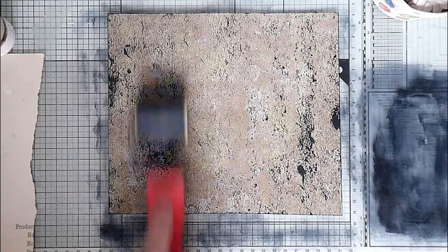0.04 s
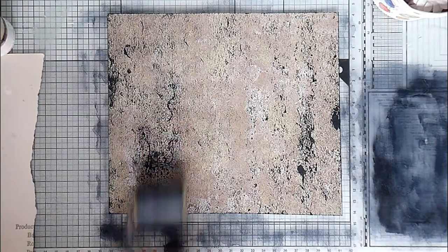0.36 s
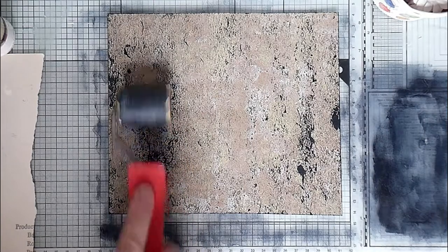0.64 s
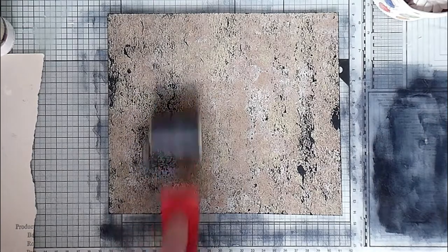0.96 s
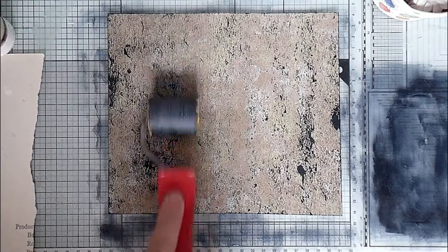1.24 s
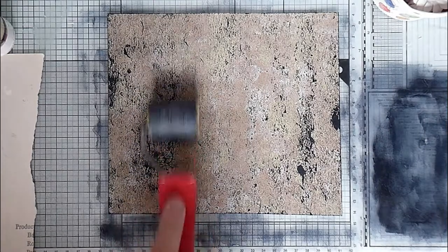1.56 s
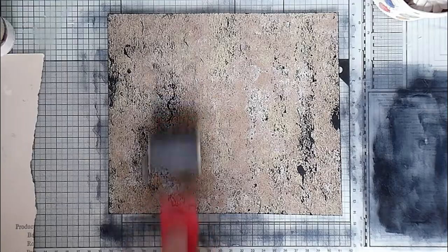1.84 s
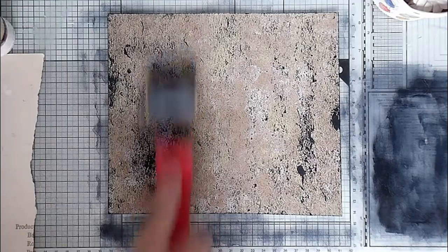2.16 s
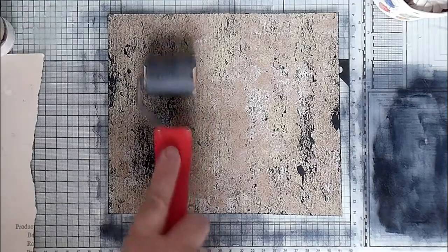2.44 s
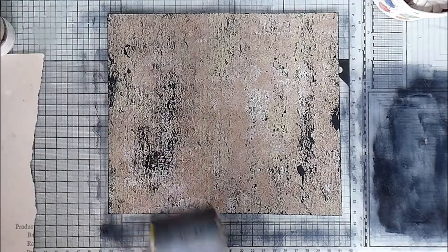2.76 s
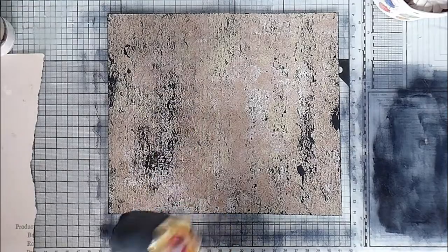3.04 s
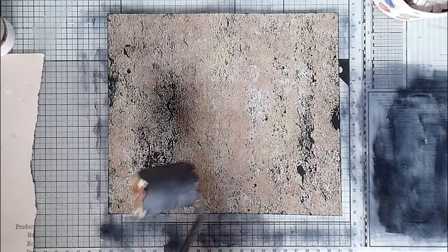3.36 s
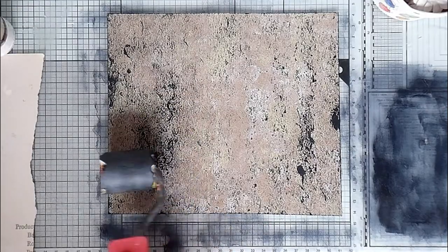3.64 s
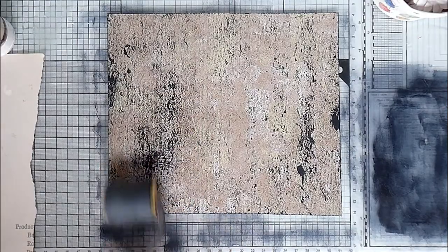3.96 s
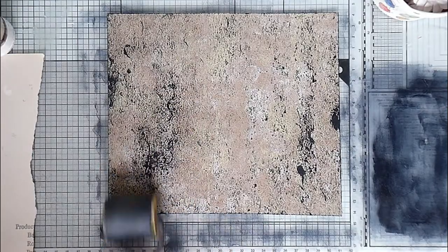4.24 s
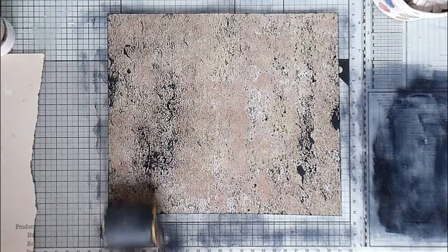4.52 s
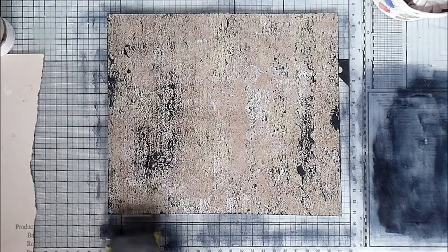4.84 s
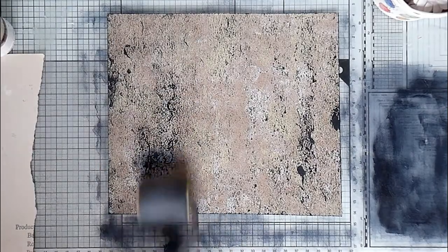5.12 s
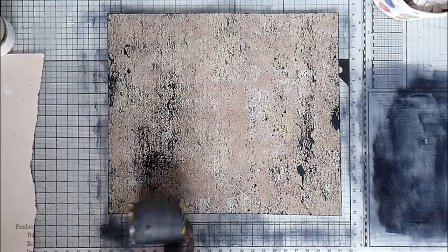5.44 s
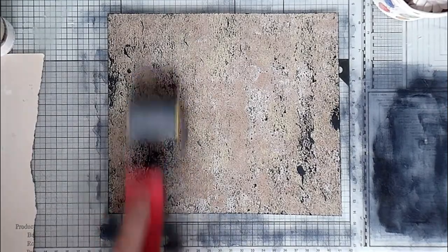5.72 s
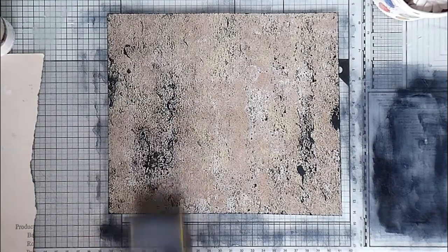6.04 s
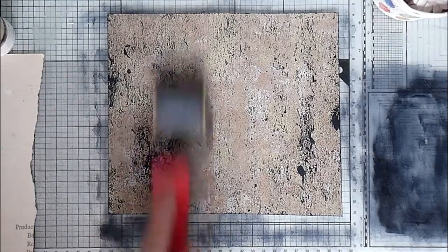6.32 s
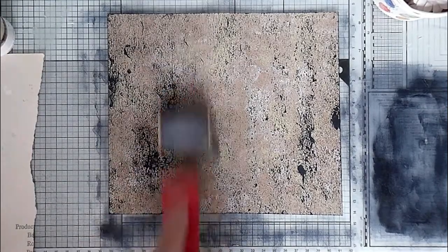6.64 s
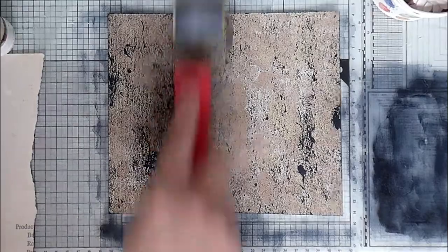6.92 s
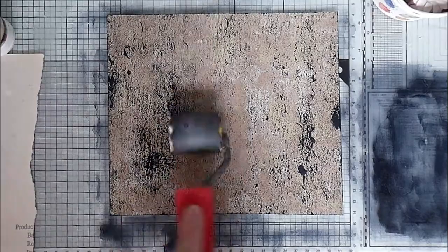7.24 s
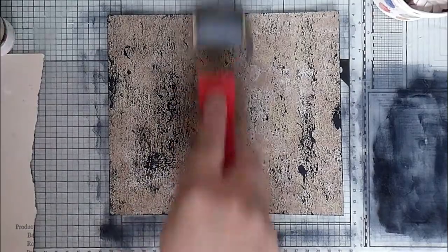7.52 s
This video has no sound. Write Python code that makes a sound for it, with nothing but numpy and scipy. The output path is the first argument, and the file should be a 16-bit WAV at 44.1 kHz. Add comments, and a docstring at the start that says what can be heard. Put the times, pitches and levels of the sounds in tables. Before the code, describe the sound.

A small rubber paint roller rubs quickly back and forth over thick card, each stroke a sticky hiss with a low rumble and faint hum. Its loose drum gives hollow plastic clicks, and hard landings knock on the table. Around three seconds in it lifts off with light scrapes and clicks, then the rolling resumes, with more sharp knocks near the end. It sounds close, in a small furnished room.

```python
"""A small rubber paint roller runs back and forth over thick card on a craft table.
As each stroke speeds up and slows, tacky paint fizzes off the drum, the card rumbles and the axle
rubs a hum from the drum; patches of paint let go with a snap. The loose drum clicks and rings hollowly
as it hits its axle stop or lands on the card. Now and then the roller lands hard and the table rings.
Off the card, the drum scrapes along its wire and the handle rustles. The room is small and furnished."""
import sys
import numpy as np
from scipy import signal
from scipy.fft import rfft, irfft, next_fast_len
from scipy.io import wavfile
from scipy.ndimage import uniform_filter1d, map_coordinates

SR = 44100
rng = np.random.default_rng(int(sys.argv[2]) if len(sys.argv) > 2 else 0)


def transcribe(signal):
    """Save signal, clipped to [-1, 1], as a 16-bit WAV file at the path in sys.argv[1]."""
    frames = np.atleast_2d(signal).T
    limited = np.clip(frames, -1, 1)
    pcm = np.round(limited * 32767).astype(np.int16)
    wavfile.write(sys.argv[1], SR, pcm)


N = 343098
T = np.arange(SR // 4) / SR  # time since a blow, s


def amp(db):
    """Decibels to gain."""
    return 10 ** (np.asarray(db) / 20)


def unit(x):
    """Scale to rms 1."""
    return x / np.sqrt(np.mean(x ** 2) + 1e-20)


def unit_head(x, span_s):
    """Scale a blow to rms 1 over its first span_s."""
    return x / np.sqrt(np.mean(x[T < span_s] ** 2) + 1e-20)


def along(points, hz):
    """Interpolate (f/Hz, value) points on a log axis."""
    f, value = np.transpose(points)
    return np.interp(np.log(hz + 1), np.log(f + 1), value)


def wobble(rate_hz):
    """Smooth random curve, rate_hz knots a second."""
    knots = rng.standard_normal(int(N * rate_hz / SR) + 4)
    return map_coordinates(knots, [np.arange(N) * rate_hz / SR])


def filtered(x, response):
    """Apply a frequency response."""
    n = x.shape[-1]
    size = next_fast_len(n + 8192)
    return irfft(rfft(x, size) * response(np.fft.rfftfreq(size, 1 / SR)), size)[..., :n]


def coloured(x, spectrum, size=1024):
    """Minimum-phase filter with the given spectrum."""
    cepstrum = irfft(np.log(amp(along(spectrum, np.fft.rfftfreq(size, 1 / SR)))))
    cepstrum[1:size // 2] *= 2
    cepstrum[size // 2 + 1:] = 0
    return signal.fftconvolve(x, irfft(np.exp(rfft(cepstrum))))[:len(x)]


def band(x, lo_hz, hi_hz, order=3, span_s=0.036):
    """One band of a blow, at rms 1 over its first span_s."""
    sos = signal.butter(order, [lo_hz, hi_hz], "band", fs=SR, output="sos")
    return unit_head(signal.sosfilt(sos, x), span_s)


def burst(t60_s):
    """Decaying noise."""
    return rng.standard_normal(len(T)) * amp(-60 * T / t60_s)


def attack(rise_s):
    """Exponential rise to 1."""
    return 1 - np.exp(-T / rise_s)


def ringing(modes, hz):
    """Damped sines at ratios of hz, in random phase."""
    return sum(amp(db - 60 * T / t60_s) * np.sin(2 * np.pi * (ratio * hz * T + rng.random()))
               for ratio, db, t60_s in modes)


def add(track, t_s, sound):
    """Mix a sound in at t_s."""
    i = round(t_s * SR)
    track[i:i + len(sound)] += sound[:N - i]


# left-right likeness: f/Hz, correlation
COHERENCE = [(60, 0.94), (150, 0.76), (380, 0.72), (950, 0.29), (2380, 0.31), (5980, 0.76), (15000, 0.73)]


def spread(pair, response):
    """Two unrelated signals become coloured, partly alike stereo of rms 1."""
    def mid_side(hz):
        angle = np.arccos(along(COHERENCE, hz)) / 2
        return response(hz) * np.array([np.cos(angle), np.sin(angle)])
    mid, side = filtered(pair, mid_side)
    return unit(np.array([mid + side, mid - side]))


def noise(spectrum):
    """Stereo noise with the given spectrum."""
    return spread(rng.standard_normal((2, N)), lambda hz: amp(along(spectrum, hz)))


# pushes and pulls: t/s, length/s, fastest point/share of length, fizz/dB, rumble/dB, hum/dB
STROKES = [(-.02, 0.28, .45, -50.5, -52, -50), (0.259, 0.24, 0.67, -48.5, -49, -50.5),
           (.575, 0.24, 0.34, -52.5, -55, -54.5), (0.769, .195, .45, -50, -53, -59.5),
           (1.03, 0.21, 0.5, -50, -54, -57), (1.217, 0.15, 0.43, -49.5, -52, -57),
           (1.36, 0.14, 0.4, -50, -52.5, -56), (1.495, 0.14, 0.54, -50, -52, -54.5),
           (1.63, 0.17, 0.6, -51, -53, -59), (1.797, 0.22, 0.56, -48, -49, -50),
           (1.998, .2, 0.54, -48, -47, -50), (2.199, 0.15, .5, -47, -49.5, -48),
           (2.362, 0.16, 0.54, -49, -48.5, -50), (2.533, .27, 0.36, -47.5, -48.5, -47.5),
           (3.791, 0.21, 0.79, -52.5, -57.5, -58), (4.016, 0.12, 0.6, -49.5, -57, -54.5),
           (4.147, 0.15, 0.54, -50.5, -56, -53), (4.317, 0.14, .47, -48, -53.5, -54.5),
           (4.449, 0.17, 0.63, -49.5, -54, -48.5), (4.625, 0.14, 0.36, -50, -56.5, -53.5),
           (4.764, 0.15, 0.52, -49.5, -53.5, -45.5), (5.152, .2, 0.47, -50, -52.5, -52.5),
           (5.357, 0.16, 0.52, -51.5, -56.5, -46.5), (5.634, 0.32, 0.63, -47, -48, -49),
           (5.933, 0.25, 0.64, -45, -45.5, -42.5), (6.297, 0.32, 0.48, -50, -50.5, -46),
           (6.595, 0.26, 0.43, -46, -45.5, -48), (6.982, 0.13, 0.18, -49.5, -58, -46),
           (7.12, 0.3, 0.34, -49, -48.5, -46), (7.473, 0.1, 0.31, -51.5, -48, -44.5),
           (7.577, 0.25, 0.46, -46.5, -46, -46.5)]


def stroke_levels(overlap_s=0.011):
    """Speed arches over each stroke; the drum still turns as the hand reverses, so strokes overlap."""
    t = np.arange(N) / SR
    levels = np.zeros((3, N))
    speed_powers = np.array([[1.23], [1.57], [1.7]])  # fizz, rumble, hum
    for start_s, length_s, fastest, *db in STROKES:
        knots_s = [start_s - overlap_s, start_s + length_s * fastest, start_s + length_s + overlap_s]
        during = (t > knots_s[0]) & (t < knots_s[2])
        speed = np.sin(np.interp(t[during], knots_s, [0, np.pi / 2, np.pi]))
        levels[:, during] = np.hypot(levels[:, during], amp(db)[:, None] * speed ** speed_powers)
    return levels


# breaking paint threads: f/Hz, level/dB
PAINT_SPECTRUM = [(650, -35), (1100, -20), (1160, -8), (1610, -5), (1860, -5.5), (2360, -6), (3300, -3.5),
                  (3690, -3.5), (5340, -4.5), (8170, -6.5), (9450, -0.5), (11400, 1), (12500, -3.5),
                  (14800, -22.5), (16000, -54)]


def paint_fizz(fizz, peak_threads_per_s=16000, clump_db=1.5):
    """Paint threads snap behind the drum, more densely at speed."""
    threads_per_s = peak_threads_per_s * np.sqrt(fizz / fizz.max())
    sizes = amp(2.9 * np.minimum(rng.exponential(size=N), 6))
    breaks = rng.random(N) < threads_per_s / SR
    threads = unit(sizes * breaks * rng.standard_normal((2, N)))
    hiss = 0.8 * rng.standard_normal((2, N))
    clumped = (threads + hiss) * amp(clump_db * wobble(170))
    return fizz * spread(clumped, lambda hz: amp(along(PAINT_SPECTRUM, hz)))


def paint_crackles(fizz, max_db=3, range_db=8, count=130):
    """Thicker threads break at random; each tick follows the strength of the stroke."""
    out = np.zeros(N)
    for place, drop in rng.random((count, 2)):
        i = int(place * (N - 1))
        tick = unit_head(coloured(burst(0.004), PAINT_SPECTRUM), 0.006)
        add(out, i / SR, fizz[i] * amp(max_db - range_db * drop) * tick)
    return out


# resonances of the turning drum: f/Hz, width/Hz, level/dB
HUM_MODES = [(847, 16, 5), (967, 25, -16.5)]


def drum_hum(waver_db=2.5):
    """Uneven rubbing on the axle keeps the hollow drum's note going."""
    def resonances(hz):
        return sum(amp(db) * 1j * hz * width_hz / (mode_hz ** 2 - hz ** 2 + 1j * hz * width_hz)
                   for mode_hz, width_hz, db in HUM_MODES)
    note = spread(rng.standard_normal((2, N)), resonances)
    envelope = np.sqrt(np.abs(uniform_filter1d(note[0] ** 2, size=SR // 30)))
    evened = unit(note / (envelope + 0.3))
    return evened * amp(waver_db * wobble(22))


# card on the table: f/Hz, level/dB
RUMBLE_SPECTRUM = [(40, -28), (70, -30), (105, -8.5), (130, -6.5), (175, -12.5), (220, 2), (300, -5.5),
                   (410, 1.5), (480, -7), (530, 4.5), (605, 5), (700, -8), (960, 1), (1150, -14),
                   (1600, -32)]
# dry rubber on card: f/Hz, level/dB
SCUFF_SPECTRUM = [(500, -17), (1200, -3.5), (1900, 4), (3400, 5), (5000, -3), (8000, -11), (14000, -36.5)]


def rolling(fizz, rumble, hum, paint_db=1, rumble_db=1, scuff_db=-8, flutter_db=3):
    """Paint fizzes, the drum hums, the card's grain shakes the table and dry rubber scuffs."""
    paint = amp(paint_db) * paint_fizz(fizz)
    drum = hum * drum_hum()
    card = amp(rumble_db) * rumble * noise(RUMBLE_SPECTRUM) * amp(flutter_db * wobble(25))
    scuff = amp(scuff_db) * np.sqrt(fizz * rumble) * noise(SCUFF_SPECTRUM)
    return paint + card + drum + scuff


# body of a tick: f/Hz, level/dB
TICK_MID = [(100, -44), (330, -21), (550, -2.5), (900, -7), (1400, -4), (1800, -3), (2250, 0), (2700, -3),
            (3300, 1), (4600, -5.5), (5800, -20.5), (9000, -52)]
# bright edge of a tick: f/Hz, level/dB
TICK_TREBLE = [(3000, -16.5), (5500, -1), (7900, -4.5), (8600, 0), (9500, 2.5), (11300, -1.5),
               (13000, -13.5), (16000, -36.5)]


def contact(spectrum, t60_s, tail_db, tail_t60_s, rise_s=0.00018):
    """A hard contact: a short crack and a weaker shiver of the frame."""
    blow = (burst(t60_s) + amp(tail_db) * burst(tail_t60_s)) * attack(rise_s)
    return unit_head(coloured(blow, spectrum), 0.0046)


# paint patches letting go: t/s, mid/dB, treble/dB
SNAPS = [(0.0565, -58, -44), (0.088, -54, -45), (0.7377, -47, -35.5), (1.2373, -48, -40.5),
         (3.9346, -44, -37.5), (4.0406, -67, -41.5), (4.092, -55.5, -42.5), (4.2171, -52, -42),
         (4.3456, -65, -39.5), (4.5814, -54, -33), (4.819, -59, -43), (5.1816, -41, -33.5),
         (5.19, -66, -42), (7.597, -53, -46), (7.603, -46, -33)]


def paint_snaps(mid_trim_db=-1):
    """Patches of paint tear off the card with a bright tick."""
    out = np.zeros(N)
    for t_s, mid_db, treble_db in SNAPS:
        mid = contact(TICK_MID, t60_s=0.0028, tail_db=-11, tail_t60_s=0.03)
        treble = contact(TICK_TREBLE, t60_s=0.0027, tail_db=-16.5, tail_t60_s=0.024)
        add(out, t_s, amp(mid_db + mid_trim_db) * mid + amp(treble_db) * treble)
    return out


# struck hollow drum: f/ring pitch, level/dB, t60/s
DRUM_MODES = [(1, -1.5, 0.062), (.93, -4, 0.028), (1.13, -23, .035), (.66, -26, 0.02)]


def hollow_click(tick_db, treble_db, ring_db, ring_hz, swell_s=0.0075, ring_trim_db=-2):
    """A plastic tick, after which the drum's hollow note swells and fades."""
    note = unit_head(ringing(DRUM_MODES, ring_hz) * attack(swell_s), 0.021)
    tick = contact(TICK_MID, t60_s=0.0047, tail_db=-17, tail_t60_s=0.06, rise_s=0.00021)
    treble = contact(TICK_TREBLE, t60_s=0.0063, tail_db=-13.5, tail_t60_s=0.03)
    return amp(ring_db + ring_trim_db) * note + amp(tick_db) * tick + amp(treble_db) * treble


# clicks of the drum as it hits its axle stop or lands on the card:
# t/s, tick/dB, treble/dB, ring/dB, ring f/Hz, graze lead/s (0 = none), graze re hit/dB
DRUM_CLICKS = [(0.4713, -40, -53, -34.5, 830, 0.0031, -0.5), (0.5518, -30.5, -39, -29.5, 833, 0.0067, -4.5),
               (0.797, -62, -77, -45.5, 843, 0.00037, 0), (0.934, -30.5, -41.5, -43, 845, 0.02, -15),
               (0.999, -30.5, -45, -31.5, 880, 0.0018, 1), (2.7473, -31, -42, -34, 826, 0.0097, -3),
               (2.8643, -32.5, -48, -40, 878, 0.022, -9.5), (2.9226, -36, -62, -42.5, 826, 0.0027, -1),
               (3.1456, -28, -30.5, -41.5, 860, 0.00021, 0), (3.1833, -37.5, -42, -38, 898, 0.0024, -1),
               (3.312, -31.5, -37.5, -36.5, 868, 0, 4), (3.8112, -26.5, -31, -32.5, 844, 0.00046, 0),
               (4.9372, -33.5, -49.5, -37, 825, 0.0073, -14), (5.017, -48.5, -72, -41.5, 809, 0.013, -0.5),
               (5.0952, -29.5, -41, -33.5, 850, 0.016, -5.5), (5.2206, -38.5, -61, -47, 855, 0, 0),
               (5.5793, -42.5, -70, -40.5, 850, .0073, -6), (5.6262, -39.5, -68, -35, 843, 0, 0),
               (6.1728, -33, -33, -34.5, 820, 0, 0), (6.244, -32, -43.5, -33.5, 830, 0.0097, -4),
               (6.838, -30, -42, -31.5, 829, .0125, -7.5), (6.9089, -44, -56, -41, 825, 0.0055, 0.5),
               (7.368, -33.5, -42.5, -35.5, 815, 0.0035, -2), (7.4255, -30, -39, -33.5, 829.4, 0.0044, -8)]


def drum_clicks(dull_db=-7):
    """The loose drum hits its axle stop or lands on the card, often with a duller graze just before."""
    out = np.zeros(N)
    for t_s, tick_db, treble_db, ring_db, hz, lead_s, graze_db in DRUM_CLICKS:
        add(out, t_s, hollow_click(tick_db, treble_db, ring_db, hz))
        if lead_s > 0:
            graze_treble_db = treble_db + graze_db + dull_db
            graze = hollow_click(tick_db + graze_db, graze_treble_db, ring_db + graze_db, hz)
            add(out, t_s - lead_s, graze)
    return out


# roller frame: f/crack pitch, level/dB, t60/s
FRAME_MODES = [(0.721, -12, 0.0067), (.88, -5, 0.0088), (1, -8, 0.013), (1.12, 3, 0.0048),
               (1.45, -18, 0.02)]


def frame_crack(hz):
    """The frame strikes the axle and rings briefly."""
    ring = unit_head(ringing(FRAME_MODES, hz) * attack(0.00031), 0.0046)
    tick = contact(TICK_MID, t60_s=0.0092, tail_db=-5.5, tail_t60_s=0.048)
    return unit_head(ring + amp(-4.5) * tick, 0.0071)


# card and table: f/Hz, level/dB, t60/s
TABLE_MODES = [(126.7, -3, 0.12), (138.7, -2.5, .13), (176, -4.5, 0.076), (236, 8, 0.037),
               (291, -7.5, 0.058), (353, -4, 0.032), (446, -6.5, 0.097), (546, 2, 0.035),
               (614, -1.5, 0.036), (837, 2.5, 0.083), (950, -10, 0.045), (1265, -31, 0.028),
               (1390, 0.5, 0.087), (1650, 11, 0.013)]


def table_thud(taps=3, chatter_s=0.009):
    """The drum's chatter rings card and table (thud); the hand's weight drives the low modes (boom)."""
    chatter = np.zeros(len(T))
    strengths = rng.uniform(0.12, 0.48, taps) * rng.choice([-1, 1], taps)
    chatter[(rng.random(taps) * chatter_s * SR).astype(int)] = strengths
    chatter[0] = 1
    modes = [amp(db + rng.normal(0, 1) - 60 * T / t60_s) * np.sin(2 * np.pi * hz * T)
             for hz, db, t60_s in TABLE_MODES]
    card = band(burst(0.045) * attack(0.002), 170, 900, order=2, span_s=0.02)  # many damped modes
    ring = sum(mode * rng.choice([-1, 1]) for mode in modes)
    thud = card + unit_head(signal.fftconvolve(chatter, ring)[:len(T)], 0.02)
    boom = band(sum(modes[:3]), 100, 300)
    return thud, boom


# roller set down: t/s, crack/dB, crack f/Hz, treble/dB, boom/dB, knock/dB, slap/dB
LANDINGS = [(0.5871, -15.5, 4410, -19.5, -36, -40, -32), (1.0436, -23.5, 3140, -24.5, -35, -23.5, -21),
            (3.7928, -53, 3000, -53, -48, -54.5, -53), (4.5800, -61, 3600, -59, -55.5, -69, -66),
            (5.077, -33, 4000, -43, -49.5, -52.5, -50), (5.6476, -28.5, 3620, -32.5, -26.5, -36, -26),
            (6.1340, -45.5, 2940, -38.5, -37.5, -48, -45), (6.3134, -22, 3860, -20, -26, -22.5, -18),
            (6.9897, -12.5, 3194, -22, -40, -19, -17), (7.481, -17.5, 3080, -22, -44.5, -28, -30.5)]


def landings(rebound_db=-8, rebound_s=0.007, thud_lag_s=0.001725):
    """The roller lands: the frame cracks, the table thuds and a rebound ticks."""
    out = np.zeros(N)
    for t_s, crack_db, crack_hz, treble_db, boom_db, knock_db, slap_db in LANDINGS:
        crack = frame_crack(crack_hz)
        treble = contact(TICK_TREBLE, t60_s=0.0094, tail_db=-13.5, tail_t60_s=0.083)
        rebound = contact(TICK_MID, t60_s=0.0063, tail_db=-5.5, tail_t60_s=0.1)
        thud, boom = table_thud()
        knock = amp(knock_db) * band(thud, 195, 500)
        slap = amp(slap_db) * band(thud, 450, 1350)
        add(out, t_s, amp(crack_db) * crack + amp(treble_db) * treble + amp(boom_db) * boom)
        add(out, t_s + thud_lag_s, knock + slap)
        add(out, t_s + rebound_s, amp(slap_db + rebound_db) * rebound)
    return out


def swells(rows):
    """Gain with one Gaussian bump per row."""
    t = np.arange(N) / SR
    return sum(amp(db) * np.exp(-((t - peak_s) / half_s) ** 2) for peak_s, half_s, db in rows)


# hand jostling the handle: t/s, half length/s, level/dB
JOSTLES = [(2.9, 0.09, -55.5), (3.27, 0.39, -61.5), (5.02, 0.12, -60.5), (5.58, 0.11, -58),
           (6.26, 0.045, -54), (6.94, 0.066, -56.5)]
# drum sliding along its axle: t/s, half length/s, level/dB
SLIDES = [(2.945, 0.054, -54.5), (3.12, 0.035, -49), (3.252, 0.031, -51.5), (3.352, 0.035, -51.5)]
# plastic on wire: f/Hz, level/dB
SCRAPE_SPECTRUM = [(1000, -14), (2000, -1), (2700, -10), (3400, -0.5), (4100, -5.5), (5500, -7),
                   (8000, -10), (11000, -5), (13000, -18), (15500, -42)]


def lifted_roller(hiss_db=-4):
    """Off the card, plastic scrapes thinly on the wire axle and the handle rustles in the hand."""
    scrape = noise(SCRAPE_SPECTRUM)
    rustle = noise(RUMBLE_SPECTRUM) + amp(hiss_db) * scrape
    return swells(SLIDES) * scrape + swells(JOSTLES) * rustle


# room decay: f/Hz, t60/s
ROOM_DECAY = [(120, 0.21), (600, 0.19), (3000, 0.19), (12000, 0.14)]


def room(x, delay_s=0.005):
    """A small furnished room: each frequency dies at its own speed."""
    hz, t, bins = signal.stft(rng.standard_normal((2, SR // 3)), SR, nperseg=256)
    decay = amp(-60 * t / along(ROOM_DECAY, hz)[:, None])
    _, tail = signal.istft(bins * decay, SR, nperseg=256)
    tail = spread(tail, np.ones_like)
    tail = np.pad(tail, ((0, 0), (round(delay_s * SR), 0)))
    return signal.fftconvolve(x[None], tail / np.linalg.norm(tail[0]), axes=1)[:, :N]


# left minus right at share 1: f/Hz, level/dB
PAN_LEVEL = [(60, 0), (200, 0), (500, .7), (900, 1.8), (1400, 2.8), (2500, 1.2), (5000, .3), (12000, -.4)]
# left minus right at share 1: f/Hz, phase/rad
PAN_PHASE = [(0, 0.053), (690, -0.065), (1460, -0.59), (2840, -0.18), (4570, -0.43), (7490, -0.48),
             (10400, -0.53), (12000, 0.05), (14900, -0.0), (15700, 0.1), (16100, 0.5)]


def placed(x, share):
    """Level and phase differ between the channels; the left is mostly louder."""
    def response(hz):
        left = amp(share * along(PAN_LEVEL, hz) / 2) * np.exp(0.5j * share * along(PAN_PHASE, hz))
        return np.array([left, 1 / left])
    return filtered(x, response)


# room hiss: f/Hz, level/dB
HISS_SPECTRUM = [(15, -60), (25, -38), (166, -7), (229, -14), (277, -5.5), (317, -5.5), (427, -10),
                 (463, -10.5), (1290, -14.5), (1840, -15.5), (3400, -20), (10100, -26.5), (13200, -32),
                 (14800, -36.5), (16000, -48)]


def scene(room_db=-14, hiss_db=-58.5):
    """The roller works over the room's quiet hiss; only the blows reverberate."""
    fizz, rumble, hum = stroke_levels()
    blows = drum_clicks() + paint_snaps() + landings()
    strokes = rolling(fizz, rumble, hum) + paint_crackles(fizz) + lifted_roller()
    blows = blows + amp(room_db) * room(blows)
    hiss = amp(hiss_db) * noise(HISS_SPECTRUM)
    return placed(blows, share=0.96) + placed(strokes, share=0.36) + hiss


def record(dry, ceiling=0.9, top_hz=16000):
    """Clip near full scale, then cut everything above top_hz."""
    return filtered(np.clip(dry, -ceiling, ceiling), lambda hz: hz < top_hz)


dry = scene()
out = record(dry)
transcribe(out)
```